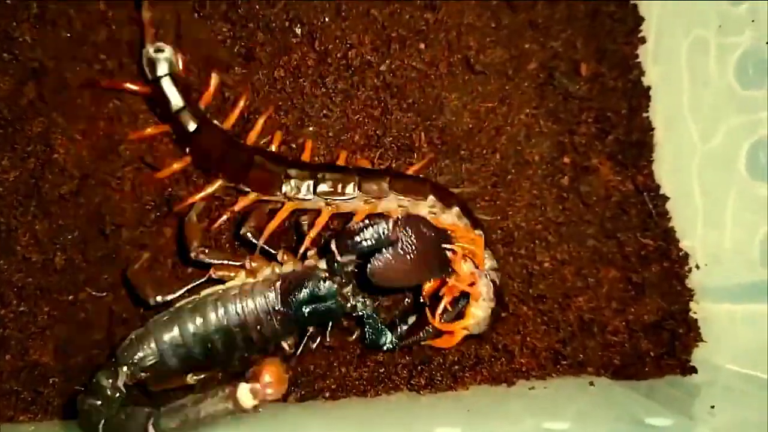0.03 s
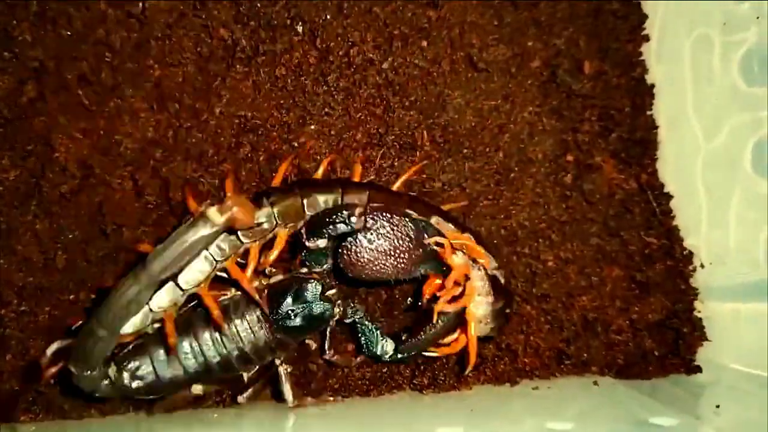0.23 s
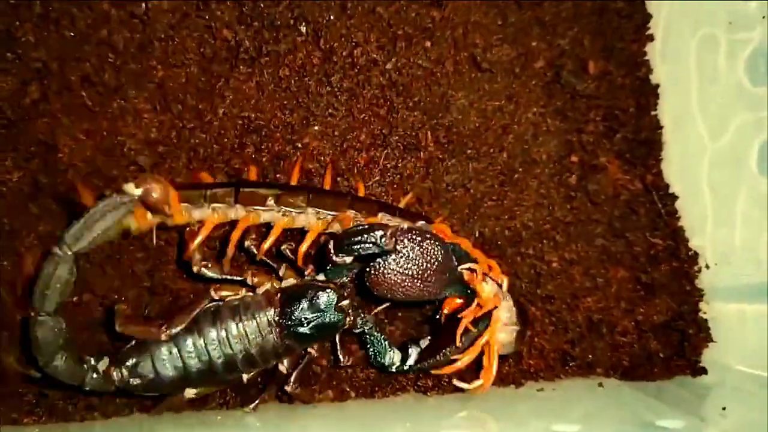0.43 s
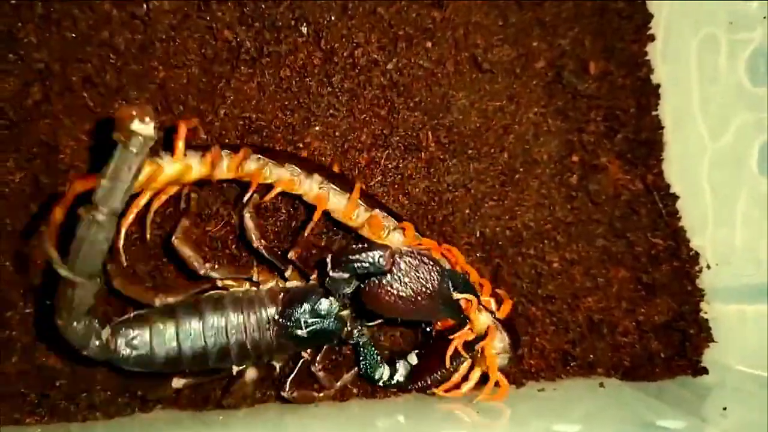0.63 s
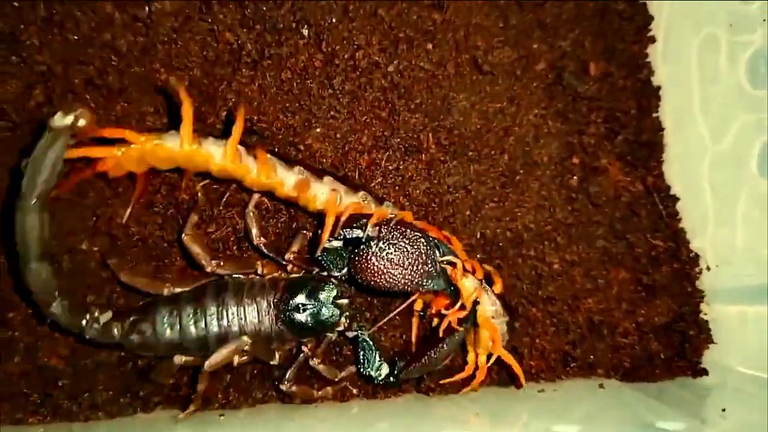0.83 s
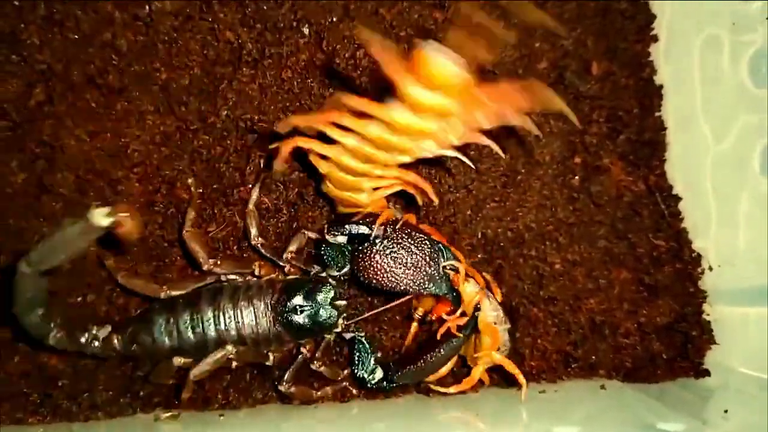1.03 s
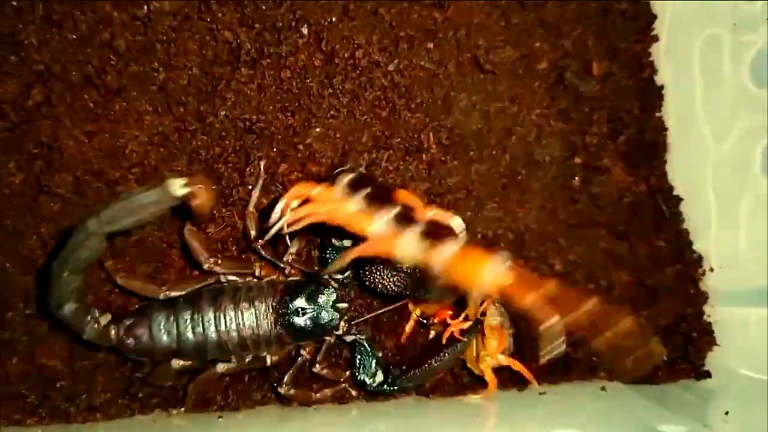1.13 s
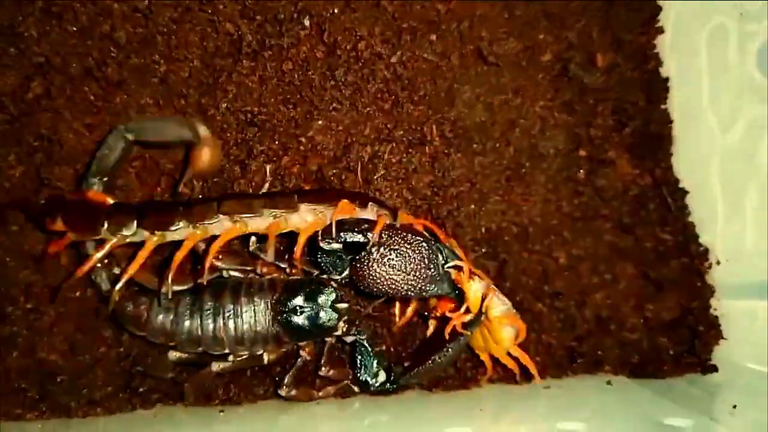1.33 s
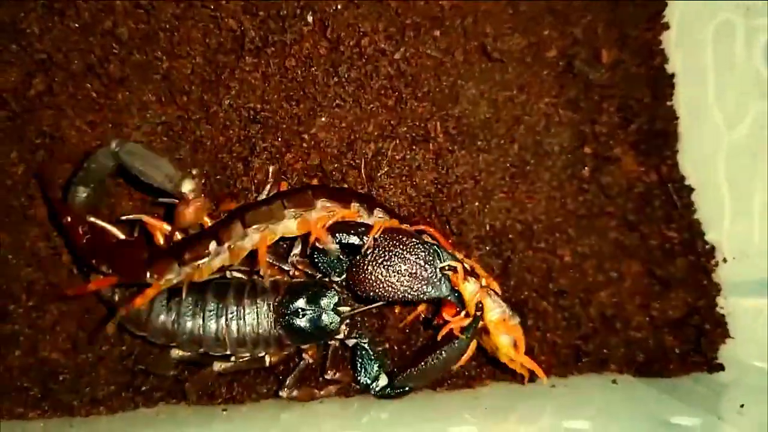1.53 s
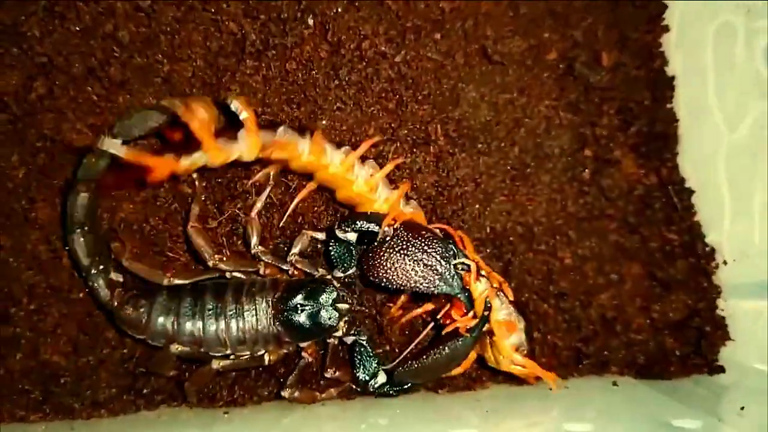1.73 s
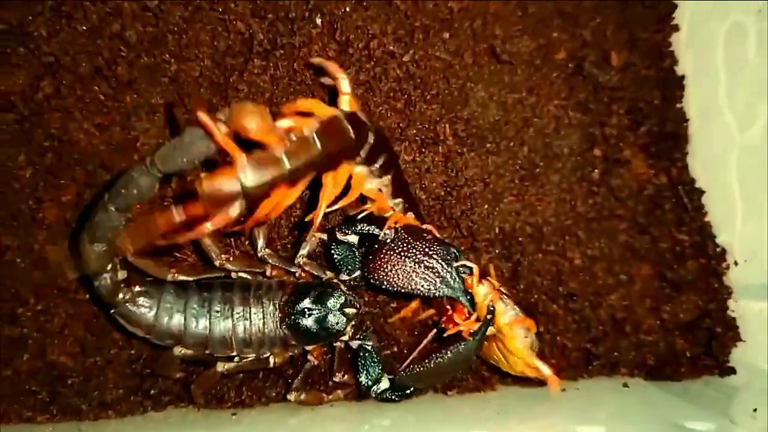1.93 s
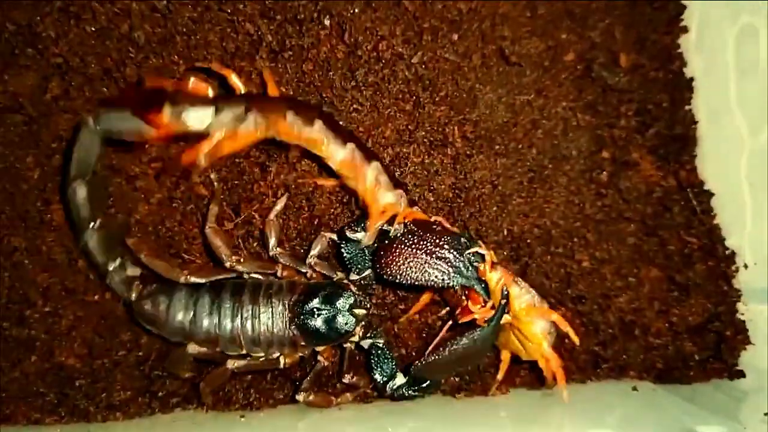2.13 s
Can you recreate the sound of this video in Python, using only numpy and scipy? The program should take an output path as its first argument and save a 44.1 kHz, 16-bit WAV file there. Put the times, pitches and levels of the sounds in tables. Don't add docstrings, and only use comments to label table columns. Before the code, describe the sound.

Close, dry ticks and rustling grains from two armoured arthropods fighting in a plastic tub; a hard double thump rings through a big reverberant room, then denser clicking and one faint thud, above a quiet throbbing hum.

```python
import sys
import numpy as np
from scipy import signal
from scipy.io import wavfile

SR = 44100
rng = np.random.default_rng(int(sys.argv[2]) if len(sys.argv) > 2 else 0)


def to_linear_factor(level_db):
    exponent = np.asarray(level_db, float) / 20
    return 10 ** exponent


def transcribe(signal):
    frames = np.atleast_2d(signal).T
    limited = np.clip(frames, -1, 1)
    pcm = np.round(limited * 32767).astype(np.int16)
    wavfile.write(sys.argv[1], SR, pcm)


N = 97020

# frequency in Hz, level in dB.
FLOOR = [(35, -1), (60, 2.5), (229, -6.5), (339, -30), (428, -19), (605, -21), (1100, -19.5), (7330, -38),
         (15000, -37)]
FLOOR_DB = -52.5
HUM_HZ, HUM_DB = 57.4, -58.5
# time in seconds, level in dB.
RUMBLE = [(0, -54), (.8, -62), (1.0, -54.5), (1.3, -54.5), (1.5, -50), (1.75, -55), (2.2, -58)]
THROB_HZ = [73.2, 111.3, 233.8]
THROB_REL_DB = [3, 0, -8]
THROB_WIDTH_HZ = 6.7

# start in seconds, length in seconds, top, middle and low level in dB.
SCRAPES = [(0, 0.032, -52.5, -65, -71.5), (0.066, 0.043, -62, -57.5, -70), (0.125, 0.14, -71, -68.5, -71),
           (0.227, 0.11, -67, -69, -58), (0.457, 0.083, -54, -66.5, -59.5), (0.596, 0.1, -60.5, -74, -90),
           (0.71, 0.11, -54, -66.5, -56), (0.829, 0.06, -58, -68.5, -63), (1.005, 0.049, -59, -66, -65.5),
           (1.447, 0.088, -58, -65.5, -69.5), (1.605, 0.034, -59, -70, -64.5),
           (1.642, 0.023, -48.5, -69, -79), (1.696, 0.087, -68, -70, -69),
           (1.772, 0.053, -55, -64.5, -62.5), (1.842, 0.035, -50, -60.5, -60),
           (1.896, 0.073, -64, -69, -70.5), (1.993, 0.052, -69, -70, -62), (2.058, 0.022, -52, -62, -62.5),
           (2.108, .1, -77, -81, -75)]
# low edge in Hz, high edge in Hz.
SCRAPE_BANDS_HZ = [(13340, 16700), (7660, 10300), (2450, 4480)]
SCRAPE_RISE_S, SCRAPE_FALL_T60_S = 0.008, 0.12
GRAINS_PER_S, GRAIN_SPREAD_DB, GRAIN_T60_S = 700, 4.0, 0.0044
GRAIN_DB, RUSTLE_DB = -3, -5

# frequency in Hz, level in dB per Hz.
HALL = [(53, -39.5), (110, -2.5), (305, -6.5), (420, -3), (1320, -10.5), (4800, -24.5), (7000, -38),
        (12000, -71.5)]
# frequency in Hz, t60 in seconds.
HALL_T60 = [(100, 1.4), (200, 2.9), (500, 2.33), (1400, 1.66), (4000, 1.06), (8000, 0.16)]
# frequency in Hz, width in Hz, level in dB.
HALL_PEAKS = [(167.3, 6.1, 9.5), (237.3, 18, 9), (308.4, 7.2, 7.5), (424, 25, 7), (492.3, 22, 3.5),
              (564.5, 8.9, -1), (715.5, 16, 5), (810, 47, 4), (939, 82, 1.5), (1025, 20, -1.5),
              (1135, 12, 6.5), (1383, 12, 3.5), (1830, 42, 4), (1940, 33, 0)]
EARLIER_DB, EARLIER_AT_S = -52.5, 0.1532
DULL_HZ = 1300
BUILD_S = 0.0058
FAR_WALL_S, FAR_WALL_DB, FAR_WALL_BUILD_S = 0.33, -38, 0.04

# start in seconds, top ring, shell and middle level in dB,
# shell pitch in Hz.
TICKS_1 = [(0.0154, -30, -50, -45, 4230), (0.0266, -29, -49, -45, 4330), (0.0482, -8, -32, -29, 4450),
           (0.3942, -53, -36.5, -69, 2670), (0.416, -40, -49, -52, 5500), (0.4577, -24, -34.5, -55, 4470),
           (0.4676, -13, -32, -42, 4380), (0.4815, -26, -59, -39.5, 4500), (0.5036, -33, -55, -48, 4000),
           (0.557, -46, -65, -53, 4000), (0.5754, -34, -61, -55, 5800), (0.613, -42, -68, -67, 4000),
           (0.6209, -36, -68, -63, 3880), (0.637, -41, -68, -62, 4000), (0.651, -33, -68, -57, 4000),
           (0.661, -40, -65, -47.5, 5800), (0.7062, -24.5, -40, -46, 4400), (0.728, -27, -58, -47, 3930),
           (0.7363, -45, -27, -56, 3300), (0.7385, -60, -56, -62, 4070), (0.802, -49, -68, -67, 4000),
           (0.812, -29, -51, -49, 4000), (0.824, -26, -62, -40, 3130), (0.847, -31, -54, -47, 3970),
           (0.976, -43, -62, -55, 4000), (1.0324, -27, -63, -39.5, 4000), (1.107, -39, -59, -57.5, 3980)]
# start in seconds, top ring, shell and middle level in dB,
# shell pitch in Hz.
TICKS_2 = [(1.213, -46, -49, -89, 4290), (1.285, -42, -62, -69, 4400), (1.3288, -42, -47, -50.5, 3830),
           (1.375, -60, -51, -65, 4400), (1.3928, -53, -52.5, -56, 2500), (1.424, -44, -48, -47, 4400),
           (1.438, -60, -52, -53, 4400), (1.444, -49, -55, -54, 3600), (1.4618, -22, -45, -41.5, 5050),
           (1.4685, -33, -45, -47, 3400), (1.493, -43, -60, -55, 4000), (1.503, -45, -67, -67, 4000),
           (1.514, -41, -57, -65, 4200), (1.547, -48, -65, -63.5, 4000), (1.592, -49, -45, -75, 3220),
           (1.601, -47, -50, -56, 3800), (1.62, -37, -53, -56, 3860), (1.631, -39.5, -58, -45, 4000),
           (1.6446, -34, -59, -58, 4020), (1.67, -19, -49, -43, 3190), (1.712, -34, -52, -51, 4200),
           (1.717, -20, -43, -49, 4200), (1.7423, -31, -48, -61, 4500), (1.7514, -6.5, -31, -37.5, 4130),
           (1.76, -44.5, -46, -55, 3530), (1.8118, -28, -36.5, -39, 3290), (1.8342, -2.5, -35, -33, 3630),
           (1.8415, -40, -43, -40, 3660), (1.858, -45, -47, -58, 3890), (1.892, -33, -70, -51, 4000),
           (1.926, -47, -65, -60, 4000), (1.9903, -34, -49, -61, 4400), (2.0016, -54, -39.5, -54, 3200),
           (2.0077, -33, -64, -48, 4000), (2.027, -60, -63, -67, 3580), (2.045, -55, -56, -59, 4200),
           (2.0612, -29.5, -49.5, -49, 2940), (2.0727, -29.5, -67, -55, 4050),
           (2.1672, -57, -44, -54, 3830)]
# low edge in Hz, high edge in Hz, t60 in seconds, offset in dB.
TICK_BANDS = [
    (13040, 15600, 0.0052, 3.5),
    (2980, 4100, 0.0085, 19),
    (7860, 10000, 0.011, 8.5),
]
TICK_RISE_S, TICK_AFTER_DB, TICK_AFTER_T60_S = 0.00024, -25.5, 0.09
SHELL_WIDTH_HZ = 300
# low edge in Hz, high edge in Hz.
TICK_LOW_HZ = (1260, 3300)
TICK_LOW_DB, LOW_LOSS_DB_PER_OCTAVE = -11, 11

# start in seconds, level in dB.
SNAPS = [(0.0487, -30), (0.2219, -22), (0.3946, -34), (0.735, -27), (1.3295, -37), (1.4455, -31),
         (1.5927, -37), (2.1672, -38)]
# low edge in Hz, high edge in Hz.
SNAP_HZ, SNAP_T60_S = (1100, 6000), 0.0017

# start in seconds, direct level in dB, hardness cut in Hz,
# crack level in dB, room level in dB.
KNOCKS = [
    (0.2120, -9, 2000, -17.5, -31),
    (0.2147, -15, 1500, -32, -50),
    (0.2214, -18, 4420, -5.5, -37.5),
]
# start in seconds, direct level in dB, hardness cut in Hz,
# crack level in dB, room level in dB.
SOFT_KNOCK = (1.7729, -27.5, 2200, -53, -52.5)
# start in seconds, direct level in dB, hardness cut in Hz,
# crack level in dB, room level in dB.
SOFT_BOUNCE = (1.7772, -39.5, 1500, -70, -70)
# frequency in Hz, level in dB, t60 in seconds.
BODY = [(122.2, -14, 0.34), (201, -6.5, 0.088), (472, -2.5, 0.032), (530, -3, 0.04), (836, -3.5, 0.066),
        (1077, 3.5, 0.0092), (1370, -6.5, 0.017), (1950, -8.5, 0.013), (2500, -6, 0.0069),
        (3170, -2.5, 0.0059)]
# frequency in Hz, level in dB, t60 in seconds.
SOFT_BODY = [(201, -12.5, 0.3), (404, 2.5, 0.028), (505, -1.5, 0.068), (834, -15.5, 0.093),
             (1080, -7, 0.049), (1326, -3, 0.021), (1960, -8, 0.013)]
# frequency in Hz, level in dB, t60 in seconds.
RIM = [(1930, -13.5, 0.025), (3140, -18.5, 0.023), (4450, -15, 0.012)]
BODY_LOW_HZ, PUSH_DB, PUSH_HZ = 95, 29, (256, 1140)
CRACK_T60_S, CRACK_LOW_HZ, SNAP_DB = 0.012, 1240, -32
SOFT_RING_HZ, SOFT_RING_WIDTH_HZ, SOFT_RING_DB, SOFT_RING_T60_S = 453, 91, -46.5, 1.72

CUTOFF_HZ, LEAK_HZ, LEAK_DB = 15680, 16500, -24


def rms_one(x):
    return x / np.sqrt(np.mean(x ** 2) + 1e-20)


def at_hz(points, hz):
    table_hz, values = np.transpose(points)
    return np.interp(np.log(hz), np.log(table_hz), values)


def band(x, low_hz, high_hz, order=2):
    edges = [low_hz, min(high_hz, SR / 2.2)]
    return signal.sosfilt(signal.butter(order, edges, "band", fs=SR, output="sos"), x)


def drift(rate):
    r = np.exp(-80 * np.pi * rate / SR)
    slow = signal.lfilter([1], [1, -2 * r, r * r], rng.standard_normal(N // 40 + 2002))
    slow = rms_one(slow[2000:])
    return np.interp(np.arange(N) / 40, np.arange(len(slow)), slow)


def dying(x, t60, hz=0):
    r = to_linear_factor(-60 / (t60 * SR))
    if not hz:
        return signal.lfilter([1], [1, -r], x + 1e-18)
    w = 2 * np.pi * hz / SR
    return signal.lfilter([0, np.sin(w)], [1, -2 * r * np.cos(w), r * r], x + 1e-18)


def peak(x, hz, width_hz):
    r = np.exp(-np.pi * width_hz / SR)
    zeros = np.array([1, 0, -1]) * (1 - r * r) / 2
    return signal.lfilter(zeros, [1, -2 * r * np.cos(2 * np.pi * hz / SR), r * r], x)


def banks(gain):
    edges = 28 * 2 ** np.arange(0, 9.4, 1 / 3)
    white = rng.standard_normal((2, N + SR))
    total = np.zeros(N)
    for k, (low, high) in enumerate(zip(edges, edges[1:])):
        total += gain(np.sqrt(low * high)) * band(white[k % 2], low, high)[SR:]
    return total


def floor():
    t = np.arange(N) / SR
    air = rms_one(banks(lambda hz: to_linear_factor(at_hz(FLOOR, hz) + 2.8 * drift(4.4))))
    hum = np.sqrt(2) * np.sin(2 * np.pi * HUM_HZ * t) * to_linear_factor(0.51 * drift(11))
    throb = np.zeros(N)
    for hz, db in zip(THROB_HZ, THROB_REL_DB):
        throb += to_linear_factor(db) * rms_one(peak(rng.standard_normal(N), hz, THROB_WIDTH_HZ))
    swell = to_linear_factor(np.interp(t, *np.transpose(RUMBLE)) - 3.0)
    return to_linear_factor(FLOOR_DB) * air + to_linear_factor(HUM_DB) * hum + swell * throb


def scuffle():
    t = np.arange(N) / SR
    shapes = []
    for start, length, *_ in SCRAPES:
        rise = np.clip((t - start) / SCRAPE_RISE_S + 1, 0, 1)
        fall = to_linear_factor(-60 * np.maximum(t - start - length, 0) / SCRAPE_FALL_T60_S)
        shapes.append(rise * fall)
    born = rng.random(N) < GRAINS_PER_S * to_linear_factor(5.0 * drift(25)) / SR
    out = np.zeros(N)
    for k, (low, high) in enumerate(SCRAPE_BANDS_HZ):
        sizes = to_linear_factor(GRAIN_SPREAD_DB * np.minimum(rng.exponential(1, N), 4)) * born
        grains = rms_one(band(dying(sizes, GRAIN_T60_S) * rng.standard_normal(N), low, high))
        rustle = rms_one(band(rng.standard_normal(N), low, high)) * to_linear_factor(0.49 * drift(14.0))
        drag = to_linear_factor(np.array(SCRAPES)[:, 2 + k]) @ np.array(shapes)
        out += drag * (to_linear_factor(GRAIN_DB) * grains + to_linear_factor(RUSTLE_DB) * rustle)
    return out


def hall():
    t = np.arange(N) / SR

    def gain(hz):
        loss = 60 / at_hz(HALL_T60, hz)
        dull = 1 / (1 + (hz / DULL_HZ) ** 4)
        power = dull * to_linear_factor(EARLIER_DB - loss * (t - EARLIER_AT_S)) ** 2
        for start, *_, room_db in KNOCKS + [SOFT_KNOCK]:
            age = np.maximum(t - start, 0)
            ring = to_linear_factor(room_db - loss * age) * (1 - np.exp(-age / BUILD_S))
            power = power + (dull if start == SOFT_KNOCK[0] else 1) * ring ** 2
        late = np.maximum(t - FAR_WALL_S, 0)
        answer = to_linear_factor(FAR_WALL_DB - loss * late) * (1 - np.exp(-late / FAR_WALL_BUILD_S))
        power = power + answer ** 2 * hz ** 2 / (hz ** 2 + 500 ** 2)
        return to_linear_factor(at_hz(HALL, hz) + 17) * np.sqrt(power)

    tail = banks(gain)
    return tail + sum(to_linear_factor(db) * peak(tail, hz, width) for hz, width, db in HALL_PEAKS)


def ticks():
    rows = np.array(TICKS_1 + TICKS_2)
    starts = (rows[:, 0] * SR).astype(int)
    r = np.exp(-1 / (TICK_RISE_S * SR))
    soften = [1 - r], [1, -r]
    length = SR // 40
    out = np.zeros(N)
    for k, (low, high, t60, offset_db) in enumerate(TICK_BANDS):
        noise = np.tanh(2 * rng.standard_normal(N))
        clicks = np.zeros(N)
        clicks[starts] = to_linear_factor(rows[:, 1 + k] + offset_db)
        after = to_linear_factor(TICK_AFTER_DB) * dying(clicks, TICK_AFTER_T60_S)
        if k != 1:
            envelope = signal.lfilter(*soften, dying(clicks, t60) + after)
            out += band(envelope * noise, low, high)
            continue
        out += band(after * noise, low, high)
        envelope = signal.lfilter(*soften, to_linear_factor(-60 * np.arange(length) / SR / t60))
        for i, hz in zip(starts, rows[:, 4]):
            span = slice(i, i + length)
            burst = clicks[i] * envelope * noise[span]
            low_db = TICK_LOW_DB - LOW_LOSS_DB_PER_OCTAVE * np.log2(hz / low)
            out[span] += band(burst, hz - SHELL_WIDTH_HZ / 2, hz + SHELL_WIDTH_HZ / 2, order=1)
            out[span] += to_linear_factor(low_db) * band(burst, *TICK_LOW_HZ)
    return out


def snaps():
    start_s, db = np.transpose(SNAPS)
    clicks = np.zeros(N)
    clicks[(start_s * SR).astype(int)] = to_linear_factor(db)
    return band(dying(clicks, SNAP_T60_S), *SNAP_HZ, order=1)


def knock(row, body):
    start, db, cut_hz, crack_db, _ = row
    click = np.zeros(N)
    click[int(start * SR)] = 1
    ring = np.zeros(N)
    for k, (hz, level_db, t60) in enumerate(body):
        sign = (-1) ** (k // 2)
        ring += sign * to_linear_factor(db + level_db) * dying(click, t60, hz)
    ring = band(ring, BODY_LOW_HZ, cut_hz, order=3)
    push = to_linear_factor(db + PUSH_DB) * band(click, *PUSH_HZ, order=3)
    crack = to_linear_factor(crack_db) * dying(click, CRACK_T60_S) * rng.standard_normal(N)
    snap = to_linear_factor(SNAP_DB) * crack * (cut_hz > 3000)
    return ring - push + band(crack, CRACK_LOW_HZ, max(cut_hz, 3 * CRACK_LOW_HZ), order=4) + snap


def double_knock():
    return sum(knock(row, BODY) for row in KNOCKS)


def rim():
    click = np.zeros(N)
    click[int(KNOCKS[-1][0] * SR)] = 1
    return sum(to_linear_factor(db) * dying(click, t60, hz) for hz, db, t60 in RIM)


def soft_knock():
    age = np.maximum(np.arange(N) / SR - SOFT_KNOCK[0], 0)
    tone = peak(rng.standard_normal(N), SOFT_RING_HZ, SOFT_RING_WIDTH_HZ)
    tone = rms_one(peak(tone, SOFT_RING_HZ, SOFT_RING_WIDTH_HZ))
    linger = tone * to_linear_factor(SOFT_RING_DB - 60 * age / SOFT_RING_T60_S) * (1 - np.exp(-age / BUILD_S))
    return knock(SOFT_KNOCK, SOFT_BODY) + knock(SOFT_BOUNCE, SOFT_BODY) + linger


def scene():
    clicks = ticks() + snaps()
    mix = floor() + scuffle() + hall() + clicks + double_knock() + rim() + soft_knock()
    top = signal.cheby2(24, 45, CUTOFF_HZ, fs=SR, output="sos")
    leak = to_linear_factor(LEAK_DB) * band(clicks, CUTOFF_HZ - 200, LEAK_HZ, order=4)
    return (signal.sosfilt(top, mix) + leak)[None]


def low_pass(x):
    return signal.sosfilt(signal.butter(12, 16630, fs=SR, output="sos"), x)


def record(dry):
    bass_cut = signal.butter(3, 48, "high", fs=SR, output="sos")
    return low_pass(signal.sosfilt(bass_cut, dry))


dry = scene()
out = record(dry)
transcribe(out)
```